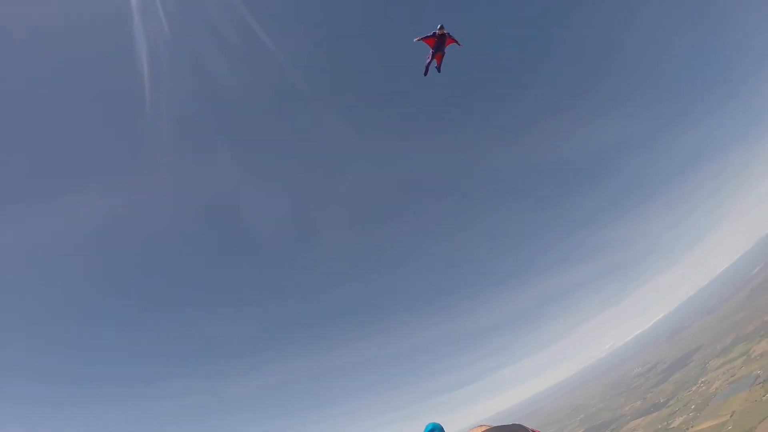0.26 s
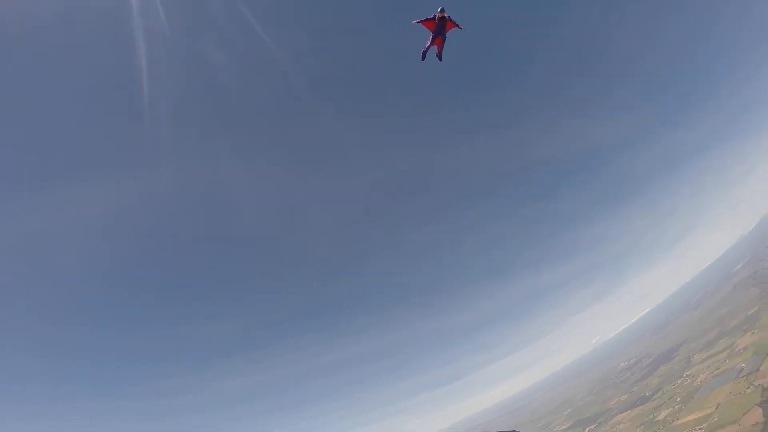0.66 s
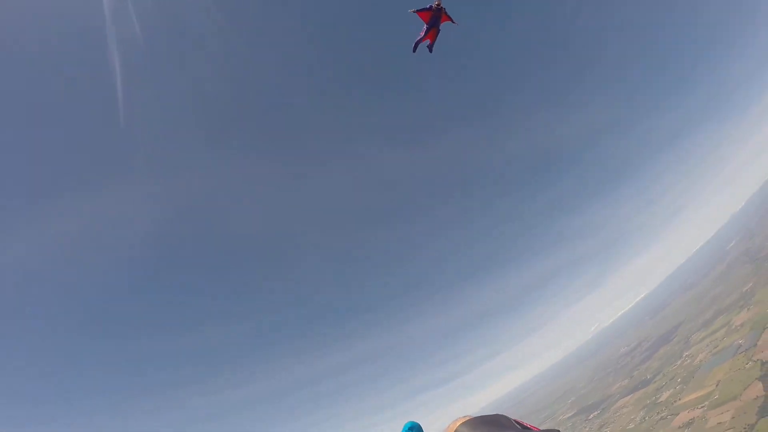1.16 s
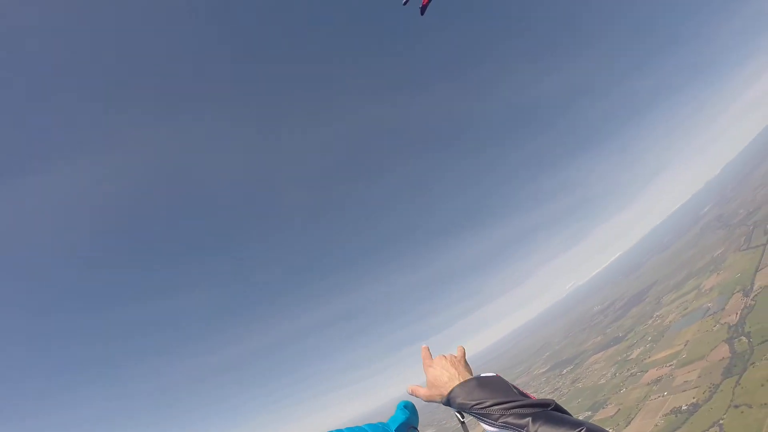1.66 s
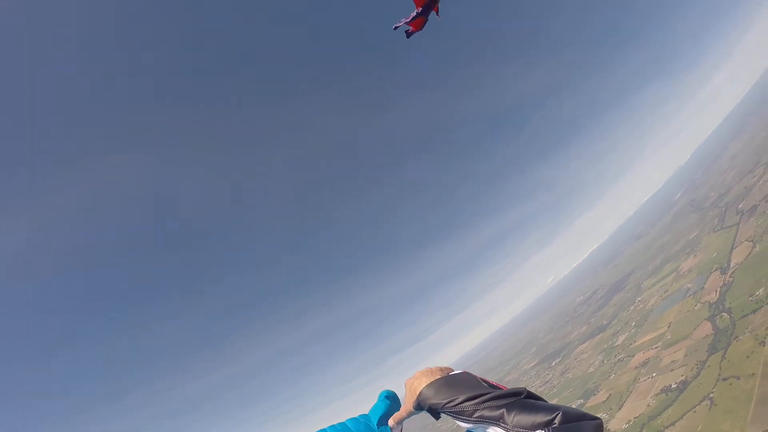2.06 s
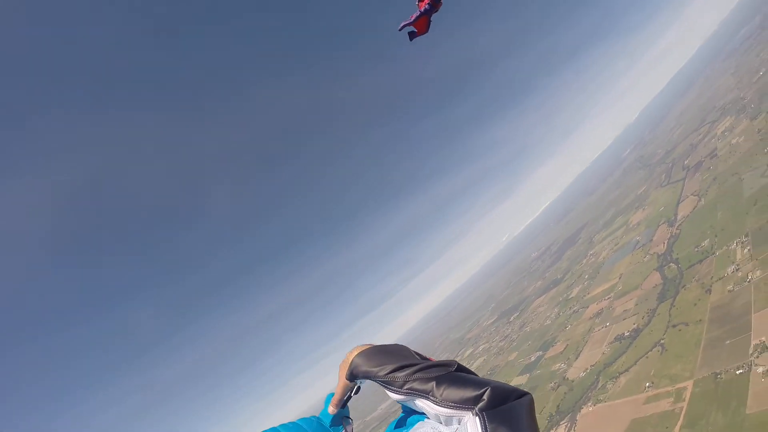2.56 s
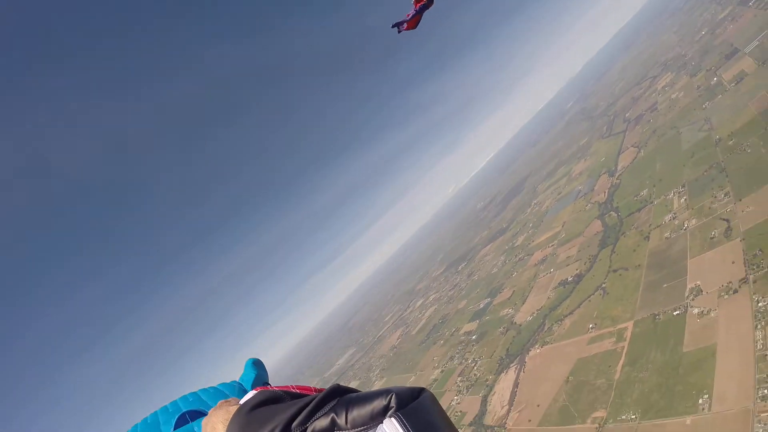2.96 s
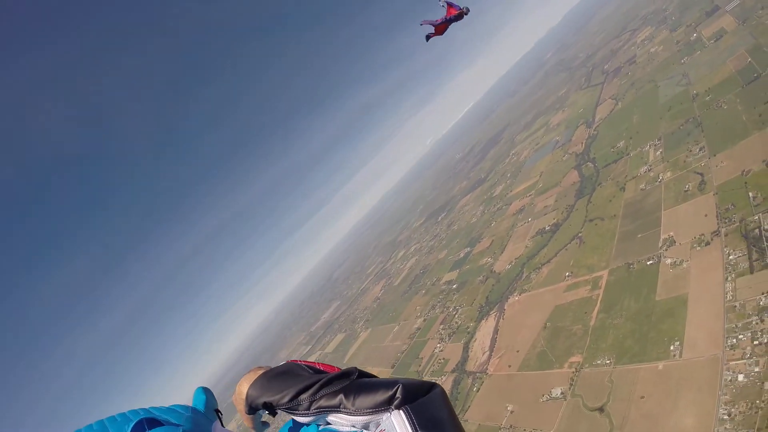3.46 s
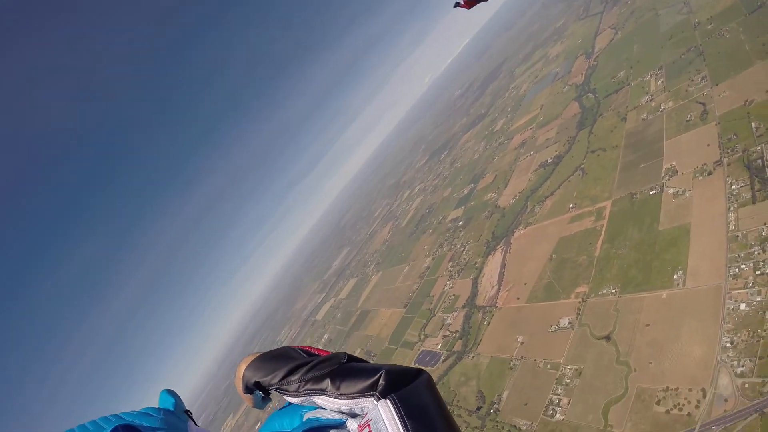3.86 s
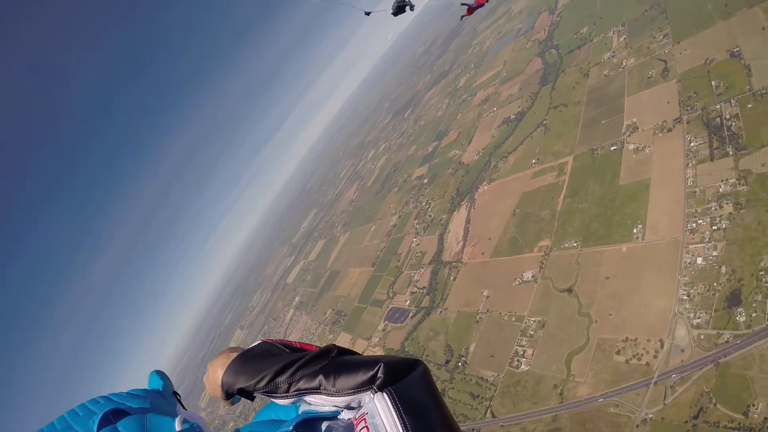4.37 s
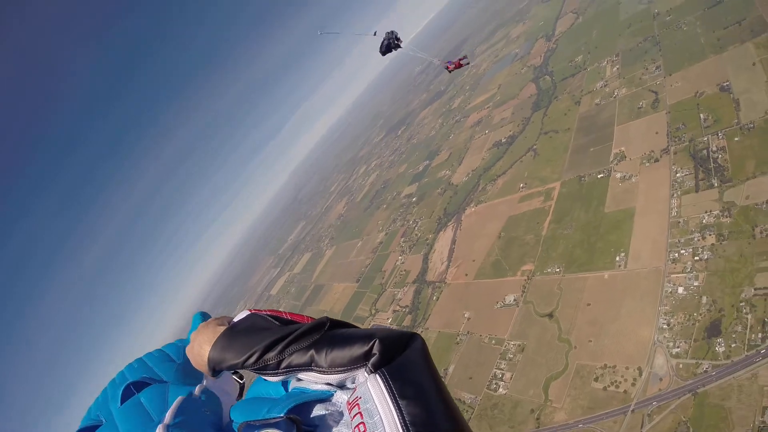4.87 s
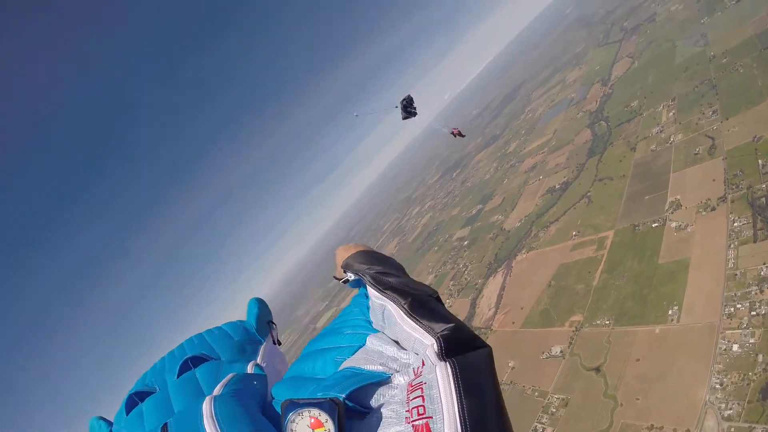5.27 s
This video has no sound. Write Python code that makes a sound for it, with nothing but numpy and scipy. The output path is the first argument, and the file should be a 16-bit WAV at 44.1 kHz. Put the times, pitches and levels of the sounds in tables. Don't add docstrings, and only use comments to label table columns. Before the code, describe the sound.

Mono wind noise from a small camera worn by a skydiver in freefall, with no room or echo. From 0 to 2.1 s the microphone is partly sheltered: deep irregular thumps around 100 Hz batter the case over a sub rumble, with a softer midrange rush leaking in. Loose fabric slaps dryly in quick irregular snaps, densest from 0.1 to 1.1 s, with a few more until 1.5 s. The hardest thumps, near 1.2 and 1.5 s, round off and make the level duck briefly. At about 2.1 s the stream swings across the microphone and a loud, coloured hiss appears almost at once, strongest around 3 kHz. A bright airy shear swells by 2.4 s, flares near 3.05 s, then thins and fades after 4 s. The hiss holds steady to the end at 5.5 s, over weaker, scattered low thumps. The treble is cut above about 15 kHz.

```python
import sys
import numpy as np
from scipy import signal
from scipy.fft import rfft, irfft, next_fast_len
from scipy.io import wavfile
from scipy.ndimage import uniform_filter1d

SR = 44100
rng = np.random.default_rng(int(sys.argv[2]) if len(sys.argv) > 2 else 0)


def wrap_up_sound(samples):
    columns = np.atleast_2d(samples).T
    tamed = np.clip(columns, -1, 1)
    steps = np.round(tamed * 32767).astype(np.int16)
    wavfile.write(sys.argv[1], SR, steps)


def volts_from_decibels(level):
    exponent = np.asarray(level, float) / 20
    return 10 ** exponent


N = 243381
TIME = np.arange(N) / SR
SIZE = next_fast_len(N)
FREQ = np.maximum(np.arange(SIZE // 2 + 1) * SR / SIZE, 1)

# f/Hz, width/Hz, level/dB
CASE_MODES = [
    (95.3, 37, 1.5),
    (158.7, 39.6, -3),
    (38, 61, 4.5),
]
# t/s, strength/dB, share of small quick eddies/dB
WAKE_EDDIES = [(0, -17.5, 3.5), (0.6, -17.5, -2.5), (1.0, -17.5, 1), (1.3, -14, -11.5), (1.55, -16.5, 3.5),
               (1.9, -12, -11.5), (2.43, -23.5, -9), (3.0, -25, -15), (3.4, -28, -11), (3.85, -31, -1.5),
               (4.2, -25, -9), (4.7, -32.5, -2), (5.1, -30.5, -1), (5.52, -23, -6)]
# t/s, peak/dB, length/s, upper mode share/dB
BIG_EDDIES = [(0.127, -13, 0.027, -21), (0.214, -12.0, 0.065, -3.5), (0.318, -14.5, 0.022, 2.5),
              (0.494, -13, 0.036, -3), (0.555, -11, 0.031, -16), (0.755, -10.5, 0.047, -11),
              (0.834, -12, 0.039, -5), (1.069, -11.5, 0.057, -18.3), (1.134, -12.5, 0.071, -19),
              (1.228, -7.5, 0.015, -21), (1.448, -14.5, 0.16, -2), (1.535, -5.5, 0.023, -11),
              (1.634, -13, 0.049, -2), (1.78, -14, 0.03, -2.5), (1.894, -11.3, 0.049, -17.1),
              (2.092, -13.5, 0.12, -21), (2.269, -15, 0.026, -18.3), (2.359, -11.5, 0.016, -26),
              (2.563, -17, 0.082, -20), (2.803, -16.5, 0.063, -25), (3.037, -22, 0.1, -16.3),
              (3.085, -19, 0.025, -17), (3.502, -24, 0.049, -16.6), (3.73, -22, 0.035, -13.2),
              (4.175, -21.5, 0.042, -10.5), (4.419, -19, 0.043, -11), (4.572, -25.4, 0.02, -2.1),
              (5.028, -22, 0.026, -14)]

# f/Hz, density/dB per Hz
LEE_BED = [(150, 3.5), (300, -1), (550, -8.5), (1000, -2.5), (2100, -7.5), (3400, -3.5), (3900, -15.5),
           (6400, -17.5), (10000, -17.5), (11000, -21), (13200, -28), (15200, -32)]
# f/Hz, width/Hz, lift/dB
LEE_MODES = [(817, 220, 4.5), (1690, 640, 5), (2510, 700, 4.5), (4460, 850, 6), (5590, 620, 4.5),
             (7520, 630, 3.5), (8900, 250, 1), (12160, 770, 8)]
# t/s, strength/dB
LEAK = [
    (0, -4),
    (.12, -1.5),
    (.6, -1.5),
    (1.0, 0),
    (1.35, -1),
    (1.6, -3),
    (1.85, -2),
    (2.11, -2.5),
]
# f/Hz, offset/dB, share of the change [ratio]
LEAK_ZONES = [(700, -1, 0.2), (2300, -.5, 0.75), (5500, 1.1, 1.24), (10000, 0, 1.15)]

# t/s, peak/dB, centre f/Hz
FABRIC_SLAPS = [(0.106, -18, 810), (0.198, -13, 953), (0.312, -13, 1100), (0.379, -31, 826),
                (0.487, -13, 880), (0.583, -10, 930), (0.629, -9, 1190), (0.794, -13.5, 791),
                (0.846, -9, 1100), (0.897, -24, 1570), (1.065, -11, 1580), (1.308, -12.5, 1330),
                (1.35, -12.5, 780), (1.509, -21, 1730)]

# f/Hz, density/dB per Hz
STREAM_BED = [(150, -9.5), (300, -14.5), (500, -18), (1050, -14.5), (2050, -14.5), (3600, -10.5),
              (4150, -19), (5000, -24.5), (6500, -27), (8300, -34), (11000, -34.5), (12800, -31),
              (13600, -44), (15200, -50)]
# f/Hz, width/Hz, lift/dB
STREAM_MODES = [(780, 200, 5.5), (1570, 600, 9), (1867, 34, 5), (2423, 530, 4.5), (2953, 517, 6.5),
                (3335, 587, 8), (4440, 310, 6.5), (4638, 185, 10), (5590, 640, 6.5), (6030, 470, 5.5),
                (6700, 300, 2.5), (7480, 340, 4), (8500, 1100, 1), (9620, 630, 8), (10120, 440, 6),
                (11900, 500, 4.5)]
# t/s, strength/dB, how far the wake reaches the port/dB
SWEEP = [(2.12, -5.5, -3.5), (2.19, -6.5, -1), (2.25, -3, -1), (2.43, -1.5, -2), (2.65, -1.5, -1),
         (2.95, -0.5, -4.5), (3.06, 0, -1.5), (3.1, 1, -7), (3.4, 0, -5), (3.75, -1, -4.5),
         (3.98, -.5, -3.5), (4.1, 0, -1), (4.4, -.5, 0.5), (4.75, -0.5, -1), (5.15, -1, -0.5),
         (5.52, 0, -1.5)]
# f/Hz, offset/dB, share of strength, share of wake [ratios], shift just after the turn/dB
SWEEP_ZONES = [(810, -.5, .3, 1.01, -2.5), (1670, -0.5, .2, .45, 4), (3120, 0, 0.89, .01, 1),
               (5500, -.5, 0.57, 0.18, -4.5), (13800, -.5, .3, .1, -1)]

# f/Hz, density/dB per Hz
RIM_BED = [(4700, -11), (6000, -16), (7000, -16.5), (9000, -17), (11500, -16.5), (12900, -21), (13600, -31),
           (15200, -29)]
# f/Hz, width/Hz, lift/dB
RIM_MODES = [(5390, 640, 12.5), (7800, 610, 3.5), (8300, 550, 6.5), (9580, 550, 11), (10120, 600, 8),
             (12300, 400, 6)]
# t/s, strength/dB, brightness/dB per octave
SHEAR = [
    (2.12, -16, 8),
    (2.25, -5.5, -4),
    (2.42, 1, -1),
    (2.65, 0.5, -1),
    (2.95, -2.5, 7),
    (3.06, 0.5, 4),
    (3.1, -5.5, 5),
    (3.9, -7, -1),
    (4.06, -13, 4),
]
# t/s, depth/dB, recovery/s
GAIN_DUCKS = [(.125, 8, 0.013), (.21, 6.5, 0.027), (.77, 1, .03), (1.228, 9, 0.025), (1.532, 8, 0.033),
              (1.625, 3, 0.1), (1.885, 4, 0.038), (2.07, 1.5, .03), (2.15, 0.5, 0.04), (2.94, 1, .04),
              (5.33, 2, 0.029)]

CASE_STEADY, THUMP_STEADY = 0.2, 0.86
LULL_DB, LULL_S = -4.5, 0.038
SUB_DB, SUB_FOLLOWS, SUB_SWELL_DB = -38, 0.26, 1.5
SLAP_S, SLAP_DB, SLAP_LIFT_DB = 0.0038, -0.2, 0.5
TURN_S, TURN_RISE_S = 2.115, 0.015
LEE_FADE_S, SETTLE_S = 0.13, 0.18
SHEAR_TAIL_DB_PER_S, SHEAR_PIVOT_HZ = -7, 8500
MIC_LOW_HZ = 27.8


def level(x, db):
    return x * volts_from_decibels(db) / np.sqrt(np.mean(x ** 2))


def curves(table):
    s, *columns = np.transpose(table)
    return [np.interp(TIME, s, column) for column in columns]


def walk(rate):
    hold = int(SR / 16 / np.clip(rate, 0.1, 200))
    slow = np.repeat(rng.standard_normal(N // 16 // hold + 2), hold)
    slow = uniform_filter1d(uniform_filter1d(slow, hold), hold)
    return 1.3 * np.interp(np.arange(N) / 16, np.arange(len(slow)), slow)


def ring(x, hz, width_hz):
    b, a = signal.iirpeak(hz, hz / width_hz, fs=SR)
    return signal.lfilter(b, a, signal.lfilter(b, a, x))


def flow(bed, modes, zones, zones_hz, centres_hz, level_db, gust_db, burst_db, patch_db, flicker_db):
    hz, db = np.transpose(bed)
    colour = np.interp(np.log(FREQ), np.log(hz), db)
    colour = colour - 24 * np.maximum(np.log2(hz[0] / FREQ), 0)
    for f, width, lift in modes:
        colour = colour + lift * np.exp(-(2 * (FREQ - f) / width) ** 2)
    noise = irfft(rfft(rng.standard_normal(SIZE)) * volts_from_decibels(colour), SIZE)
    noise = rfft(level(noise, level_db))
    band = np.interp(np.log(FREQ), np.log(centres_hz), np.arange(len(centres_hz)))
    shared_db = gust_db * walk(26) + burst_db * walk(120)
    patch, out = walk(22), 0
    for k, centre in enumerate(centres_hz):
        window = np.cos(np.pi / 2 * np.clip(band - k, -1, 1)) ** 2
        place = np.interp(np.log(centre), np.log(zones_hz), np.arange(len(zones)))
        low = min(int(place), len(zones) - 2)
        zone_db = zones[low] + (place - low) * (zones[low + 1] - zones[low])
        patch = 0.55 * patch + 0.33 * walk(22)
        band_db = zone_db + shared_db + patch_db * patch + flicker_db * walk(40)
        out = out + irfft(noise * window, SIZE)[:N] * volts_from_decibels(band_db)
    return out


def buffet():
    wake_db, small_db = curves(WAKE_EDDIES)
    low, upper, lull = np.zeros((3, N))
    for s, db, length_s, share_db in BIG_EDDIES:
        bell = np.exp(-(1.92 * (TIME - s) / length_s) ** 2)
        lull = lull + np.exp(-((TIME - s) / (length_s / 2 + LULL_S)) ** 4)
        low = low + volts_from_decibels(2 * db) * bell
        upper = upper + volts_from_decibels(2 * (db + share_db)) * bell
    sub_db = SUB_DB + SUB_FOLLOWS * (wake_db + 21) + SUB_SWELL_DB * walk(15)
    wake_db = wake_db + LULL_DB * np.minimum(lull, 1)
    rests_db = [wake_db, wake_db + small_db, sub_db]
    thumps = [low, upper, volts_from_decibels(-42) * low]
    out = 0
    for (hz, width_hz, db), rest_db, thump in zip(CASE_MODES, rests_db, thumps):
        mode = ring(rng.standard_normal(N), hz, 1.265 * width_hz)
        swing = np.sqrt(uniform_filter1d(mode ** 2, size=int(2 * SR / hz)))
        swing = swing / swing.mean() + 0.16
        power = volts_from_decibels(2 * rest_db) + thump
        steady = CASE_STEADY + (THUMP_STEADY - CASE_STEADY) * thump / power
        evened = mode / swing ** np.clip(steady, 0, 1)
        out = out + level(evened, db) * np.sqrt(power)
    return out


def sheltered_port(centres_hz):
    leak_db, = curves(LEAK)
    zones = [db + share * leak_db for hz, db, share in LEAK_ZONES]
    zones_hz = [zone[0] for zone in LEAK_ZONES]
    return flow(LEE_BED, LEE_MODES, zones, zones_hz, centres_hz,
                level_db=-20.0, gust_db=0.64, burst_db=0.55, patch_db=0.0, flicker_db=0.38)


def slaps():
    out, puff = np.zeros(N), np.zeros(N)
    t = np.arange(2000) / SR
    shape = t / SLAP_S * np.exp(1 - t / SLAP_S)
    for s, db, hz in FABRIC_SLAPS:
        noise = rng.standard_normal(2000)
        snap = ring(noise, hz, 0.83 * hz)
        body = 1.45 * ring(noise, 0.41 * hz, 0.99 * hz)
        burst = (snap + body) * shape
        i = int(s * SR)
        out[i:i + 2000] += burst / np.abs(burst).max() * volts_from_decibels(db + SLAP_DB)
        puff[i:i + 2000] += shape
    return out, puff


def blown_port(centres_hz):
    stream_db, wake_db = curves(SWEEP)
    fresh = np.exp(-np.maximum(TIME - TURN_S, 0) / SETTLE_S)
    zones = [db + stream_share * stream_db + wake_share * wake_db + fresh_db * fresh
             for hz, db, stream_share, wake_share, fresh_db in SWEEP_ZONES]
    zones_hz = [zone[0] for zone in SWEEP_ZONES]
    return flow(STREAM_BED, STREAM_MODES, zones, zones_hz, centres_hz,
                level_db=-13.5, gust_db=0.01, burst_db=0.81, patch_db=0.4, flicker_db=0.12)


def rim():
    shear_db, tilt_db = curves(SHEAR)
    shear_db = shear_db + SHEAR_TAIL_DB_PER_S * np.maximum(TIME - SHEAR[-1][0], 0)
    rim_hz = [5350, 8050, 9800, 12000]
    zones = [shear_db + tilt_db * np.log2(hz / SHEAR_PIVOT_HZ) for hz in rim_hz]
    return flow(RIM_BED, RIM_MODES, zones, rim_hz, rim_hz,
                level_db=-27.5, gust_db=0.0, burst_db=1.0, patch_db=-1.2, flicker_db=-0.1)


def scene():
    turned = 1 / (1 + np.exp(-np.clip((TIME - TURN_S) / TURN_RISE_S * 4, -50, 50)))
    sheltered = np.exp(-(np.maximum(TIME - TURN_S, 0) / LEE_FADE_S) ** 2)
    half_octaves_hz = 135 * 2 ** np.arange(0, 7, 0.5)
    thumping = buffet()
    rush = sheltered_port(half_octaves_hz)
    snaps, puff = slaps()
    hiss = blown_port(half_octaves_hz) + rim()
    mix = thumping + snaps + sheltered * rush * volts_from_decibels(SLAP_LIFT_DB * puff) + turned * hiss
    return mix[None]


def band_limit(x):
    return signal.sosfilt(signal.butter(12, 15290, fs=SR, output="sos"), x)


def record(dry):
    dry = signal.lfilter(*signal.butter(1, MIC_LOW_HZ, "high", fs=SR), dry)
    duck_db = 0
    for s, db, back_s in GAIN_DUCKS:
        t = np.maximum(TIME - s, 0)
        duck_db = duck_db - db * (1 - np.exp(-t / 0.0037)) * np.exp(-t / back_s)
    mix = np.tanh(0.54 * dry * volts_from_decibels(duck_db)) / 0.56
    return band_limit(mix)


dry = scene()
out = record(dry)
wrap_up_sound(out)
```